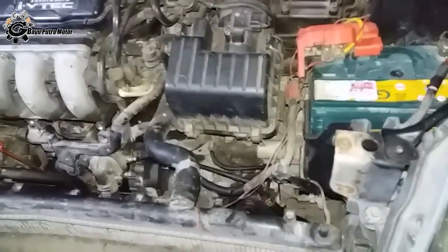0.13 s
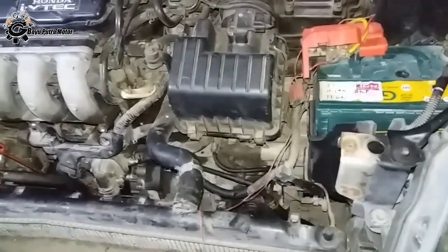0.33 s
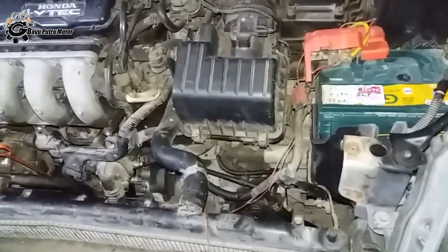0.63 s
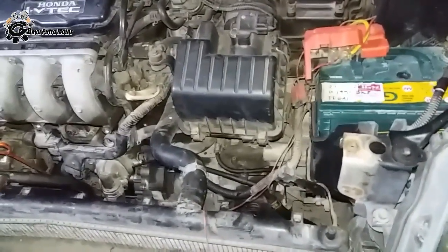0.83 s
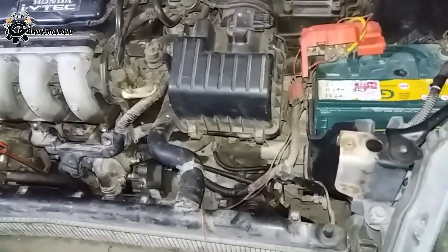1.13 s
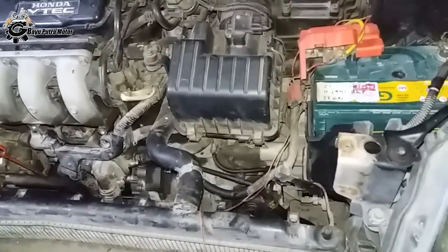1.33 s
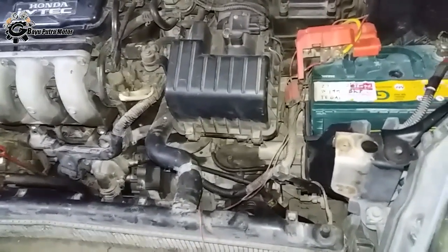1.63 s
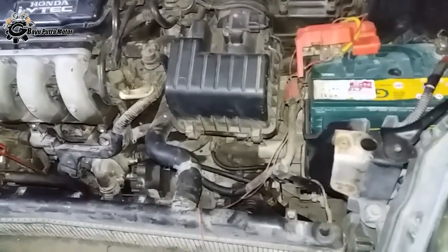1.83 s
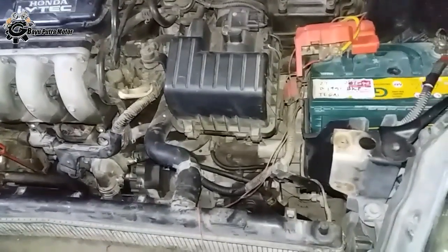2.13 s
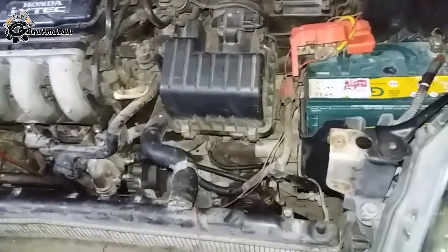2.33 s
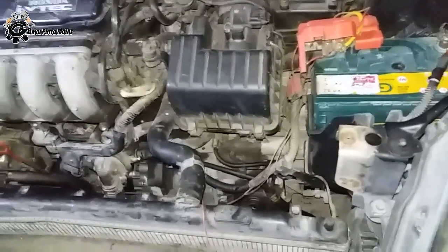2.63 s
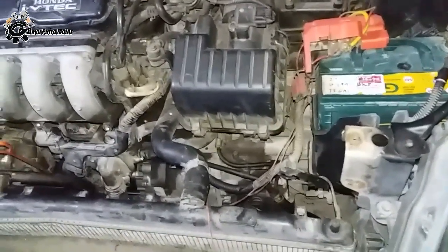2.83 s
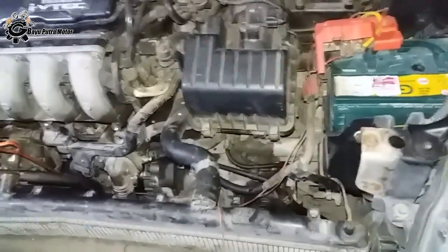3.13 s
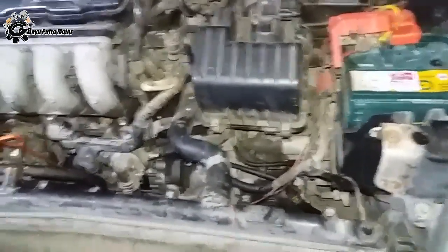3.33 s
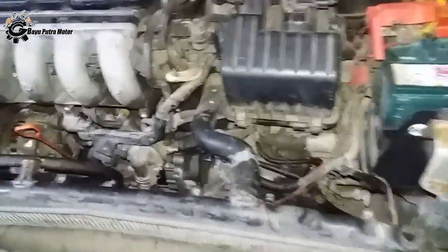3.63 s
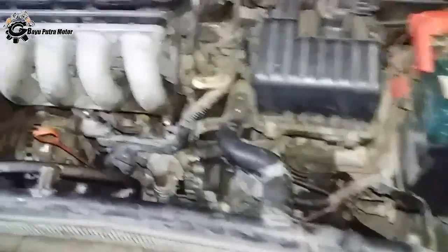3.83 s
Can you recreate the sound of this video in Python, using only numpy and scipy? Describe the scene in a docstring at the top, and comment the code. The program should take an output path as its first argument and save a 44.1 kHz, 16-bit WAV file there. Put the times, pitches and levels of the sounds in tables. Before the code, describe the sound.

A car's petrol engine cranks, catches and revs up to a fast idle.

```python
"""A quiet yard, above an open engine bay: a four-cylinder petrol engine is started.
Over a distant rumble and faint insects, the starter clacks in and its gears grind through a few
compressions. The first firings clatter unevenly, the freed starter whirrs and coasts down, and the
engine climbs smoothly to a fast idle. Hails of tiny metal contacts make the rattle, clatter and hiss;
tones that follow the turning parts make the hum and whine."""
import sys
import numpy as np
from scipy import signal
from scipy.fft import rfft, irfft
from scipy.io import wavfile

SR = 44100
rng = np.random.default_rng(int(sys.argv[2]) if len(sys.argv) > 2 else 0)


def wav_out(sig):
    """Save sig, one row per channel (or a flat mono array), as 16-bit PCM at SR to the path in sys.argv[1]."""
    wavfile.write(sys.argv[1], SR, np.round(np.clip(np.atleast_2d(sig).T, -1, 1) * 32767).astype(np.int16))


N = 176400
T = np.arange(N) / SR

# Spectra of gear rattle, metal rasp and valve and belt hiss. Each row: frequency in Hz, level in dB.
GEAR_SPECTRUM = [(70, -34), (120, -28), (310, -10.5), (594, -2), (751, -8.5), (883, -2.5), (2080, -3),
                 (2350, -13), (2900, -25), (4200, -35), (8800, -104)]
RASP_SPECTRUM = [(1500, -11.5), (2700, 3.5), (3800, -5), (4900, 7.5), (6100, -3.5), (6700, -2.5),
                 (7600, -12.5), (12500, -23.5), (14500, -22.5)]
HISS_SPECTRUM = [(2500, -19), (3650, -9), (4300, 1), (5050, 3), (5900, -1.5), (6600, 1), (7400, -9.5),
                 (9000, -13.5), (10300, -18.5), (11400, -18.5), (12500, -20), (15000, -21)]


def amp(db):
    return 10 ** (np.asarray(db) / 20)


def unit(x):
    return x / np.sqrt(np.mean(x ** 2) + 1e-20)


def curve(rows, column=1):
    """One column of a table, joined by straight lines in time."""
    rows = np.array(rows, float)
    return np.interp(T, rows[:, 0], rows[:, column])


def fader(rows, column=1):
    """A dB column as gain, silent before its first row and after an early last one."""
    holds_to_end = rows[-1][0] > .9 * T[-1]
    return amp(curve(rows, column)) * (T >= rows[0][0]) * ((T <= rows[-1][0]) | holds_to_end)


def swell(peak_s, half_s):
    """A bell-shaped rise and fall."""
    return np.exp(-((T - peak_s) / half_s) ** 2)


def drift(hz):
    """A random waver up to about hz, rms 1."""
    f = np.fft.rfftfreq(N, 1 / SR)
    return unit(irfft(rfft(rng.standard_normal(N)) * np.exp(-(f / hz) ** 2), N))


def colour(x, spectrum, ring=0):
    """Minimum-phase EQ to a spectrum, plus a share of the engine block's ring; rms 1."""
    # Resonances of block and covers. Each row: centre in Hz, width in Hz, lift in dB.
    block_modes = [(877, 120, 7.5), (1161, 52, 10), (1500, 160, 8), (1968, 190, 10.5)]
    f = np.fft.rfftfreq(N, 1 / SR)
    hz, db = np.transpose(spectrum)
    ring_db = sum(lift / (1 + (2 * (f - centre) / width) ** 2) for centre, width, lift in block_modes)
    eq_db = np.interp(np.log(f + 1), np.log(hz + 1), db) + ring * ring_db
    cepstrum = irfft(np.log(amp(np.maximum(eq_db, -100))), N)
    cepstrum[1:N // 2] *= 2
    cepstrum[N // 2 + 1:] = 0
    return unit(irfft(rfft(x) * np.exp(rfft(cepstrum)), N))


def impacts(per_s, spread_db):
    """A dense hail of small metal contacts of uneven size."""
    size = amp(spread_db * np.minimum(rng.exponential(1, N), 3))
    return unit(size * rng.choice([-1., 1.], N) * (rng.random(N) < per_s / SR))


def tone(cycles):
    """A sine of rms 1 with a random starting phase."""
    return np.sqrt(2) * np.sin(2 * np.pi * (cycles + rng.random()))


def strokes(cycles, base, decay, uneven_db):
    """A jolt at the start of each cycle on a steady base; decay is in cycles."""
    strength = amp(uneven_db * np.clip(rng.standard_normal(N), -2, 2))[cycles.astype(int)]
    return base + strength * np.exp(-(cycles % 1) / decay)


def pip(at_s, hz=5070, fall_hz_per_s=20000):
    """One tiny pip, falling in pitch."""
    t = T - at_s
    return swell(at_s, half_s=.0058) * tone(t * (hz - fall_hz_per_s * t / 2))


def yard():
    """Distant rumble, faint chirps and insects, a brief electrical whistle and a passing far-off hum."""
    # Outdoor air. Each row: frequency in Hz, level in dB.
    air_spectrum = [(15, -40), (25, -26), (75, 3), (198, -0.5), (340, -8), (469, -8), (552, -12),
                    (970, -19.5), (3170, -36), (3720, -45), (4380, -40.5), (15500, -47)]
    # High chirps of three pips that grow louder. Each entry: time of the last pip in seconds.
    chirp_times = [.029, .181, .399, .601, .789, .975, 1.195, 1.379, 1.566, 1.787, 1.971]
    # Distant insects. Each row: time in seconds, level in dB.
    insect_levels = [(.3, -96), (.65, -84.5), (1.4, -88.5), (1.72, -78), (2.05, -89)]
    # Thin electrical tones. Each row: pitch in Hz, level in dB.
    whistle_tones = [(1001, -79), (6002, -89.5)]
    air = amp(-57) * colour(rng.standard_normal(N), air_spectrum)
    chirps = sum(amp(-80.5 - 4 * k + 2 * rng.standard_normal()) * pip(s - .033 * k)
                 for s in chirp_times for k in range(3))
    insects = fader(insect_levels) * drift(hz=260) * tone(3680 * T)
    whistle = sum(amp(db) * tone(hz * T) for hz, db in whistle_tones)
    whistle += amp(-89) * drift(hz=90) * tone(5070 * T)
    hum = amp(-69) * swell(1.55, half_s=.35) * tone(470 * T) * drift(hz=22)
    return air + chirps + insects + whistle * (T < .474) + hum


def engine_bay(x, wet_db, t60_s):
    """Adds short reflections from bonnet, wings and nearby walls."""
    t = T[:SR // 2]
    tail = rng.standard_normal(len(t)) * amp(-60 * t / t60_s) * (t > .003)
    return x + amp(wet_db) * signal.fftconvolve(x, tail / np.linalg.norm(tail))[:N]


def starter_coasting():
    """The freed starter races and runs down, whirring in rotor overtones; two flare into a whine."""
    # Free rotor. Each row: time in seconds, turns per second, whirr level in dB.
    rotor = [(2.54, 314, -70), (2.6, 321, -61), (2.8, 338, -61), (2.92, 322, -58), (3.1, 276, -53.5),
             (3.45, 200, -53), (3.8, 130, -62)]
    # Whine partials. Each row: multiple of the rotor speed, relative level in dB.
    whine_partials = [(12, 3), (18, -6)]
    # Flares of the whine. Each row: peak time in seconds, half length in seconds, level in dB.
    flares = [(2.6, .035, -52), (2.925, .045, -53.5)]
    turns = np.cumsum(curve(rotor) * (1 + .004 * drift(136))) / SR
    comb = sum(amp(3 * drift(9)) * tone(k * turns) for k in range(15, 43, 3))
    lowpass = signal.butter(10, 6700, fs=SR, output="sos")
    whirr = signal.sosfilt(lowpass, colour(comb, HISS_SPECTRUM)) * fader(rotor, column=2)
    whine = sum(amp(db) * tone(k * turns) for k, db in whine_partials)
    whine *= sum(amp(db) * swell(s, half) for s, half, db in flares)
    return whirr + whine


def starter_clack(rise_s=.002):
    """Solenoid and pinion slam in, shaking the starter housing twice."""
    # Slams. Each row: start in seconds, body level in dB, treble level in dB, decay in seconds.
    slams = [(2.054, -26, -36, 0.006), (2.063, -27, -41.5, 0.02)]
    noise = rng.standard_normal(N)
    body, treble = colour(noise, GEAR_SPECTRUM, ring=.13), colour(noise, RASP_SPECTRUM)
    clacks = np.zeros(N)
    for s, body_db, treble_db, decay in slams:
        envelope = np.clip((T - s) / rise_s, 0, 1) * np.exp(-abs(T - s) / decay)
        clacks += envelope * (amp(body_db) * body + amp(treble_db) * treble)
    return clacks


def starter_cranking():
    """Pinion teeth sing, strike and rattle against the ring gear."""
    # Gear mesh, sagging at each compression. Each row: time in seconds, pitch in Hz, level in dB.
    mesh = [(2.05, 330, -74), (2.075, 563.6, -45), (2.1, 573.7, -53), (2.145, 599.4, -36),
            (2.175, 520, -50), (2.23, 604, -42), (2.252, 571, -43), (2.275, 556.2, -31), (2.298, 520, -34),
            (2.315, 440, -48), (2.335, 605, -38), (2.37, 607.3, -45), (2.412, 591.6, -35), (2.44, 500, -45),
            (2.48, 458.6, -53), (2.52, 440, -85)]
    # Partials of mesh and chatter. Each row: multiple of the mesh pitch, relative level in dB.
    mesh_partials = [(1, 0), (2, -.5), (3, -11), (4, -18), (5, -13), (6, -16)]
    chatter_partials = [(.5, -2), (1.5, -2.5), (2.5, -14)]
    # The pinion chatters on every second tooth as the load comes off.
    # Each row: peak time in seconds, half length in seconds, level in dB.
    chatter_swells = [(2.145, 0.027, -39.5), (2.339, 0.0081, -29)]
    # Grinding. Each row: time in seconds, gear rattle in dB, treble rasp in dB.
    grind = [(2.045, -56, -70), (2.053, -36, -38.5), (2.075, -32.5, -56), (2.1, -39, -49.5),
             (2.15, -31.5, -50), (2.212, -29, -53.5), (2.235, -31, -45.5), (2.283, -35.5, -39),
             (2.335, -25.5, -43.5), (2.368, -34, -41), (2.405, -39.5, -38), (2.445, -28.5, -46.5),
             (2.47, -41.5, -42.5), (2.6, -42, -58), (2.7, -40, -41.5), (2.825, -40, -40), (2.86, -67, -80)]
    teeth = np.cumsum(curve(mesh) * (1 + .015 * drift(150))) / SR
    sing = sum(amp(db + 2.5 * drift(45)) * tone(k * teeth) * (1 + .3 * drift(140))
               for k, db in mesh_partials) * fader(mesh, column=2)
    chatter = sum(amp(db) * tone(k * teeth) * (1 + .057 * drift(72)) for k, db in chatter_partials)
    chatter *= sum(amp(db) * swell(s, half) for s, half, db in chatter_swells)
    bite = strokes(teeth / 2, base=.4, decay=.4, uneven_db=2)
    every_second_tooth = np.diff(np.floor(teeth / 2), prepend=0)
    strikes = unit(every_second_tooth * (1 + .8 * rng.standard_normal(N)))
    grit = unit(bite * impacts(7000, spread_db=2))
    rattle = colour(.5 * strikes + grit, GEAR_SPECTRUM, ring=1) * fader(grind)
    rasp = colour(bite * impacts(12000, spread_db=-2.5), RASP_SPECTRUM) * fader(grind, column=2)
    return sing + chatter + rattle + rasp


def first_firings(fall_s=.0097):
    """Each hard compression or early firing jerks the crank and sets the gears clattering."""
    # Jolts. Each row: peak time in seconds, rise in seconds, level in dB.
    jolts = [(2.166, 0.011, -38), (2.264, 0.023, -28.5), (2.34, 0.0088, -41.5), (2.395, 0.0024, -27.5),
             (2.45, 0.012, -31.5), (2.486, 0.009, -27), (2.521, 0.013, -29.5), (2.601, 0.023, -30),
             (2.682, 0.011, -22.5), (2.699, 0.0039, -30), (2.734, 0.006, -24.5), (2.771, 0.011, -33.5),
             (2.799, 0.0096, -32.5), (2.828, 0.006, -32)]
    # Their clatter. Each row: frequency in Hz, level in dB.
    jolt_spectrum = [(88, -54), (432, -23), (576, 1), (759, -14.5), (1530, 7.5), (3170, -26), (4000, -17),
                     (5200, -65), (8800, -120)]
    power = sum((amp(db) * np.exp(-abs(T - s) / np.where(T < s, rise, fall_s))) ** 2
                for s, rise, db in jolts)
    hits = impacts(7000, spread_db=1.5)
    clatter = colour(hits, jolt_spectrum, ring=.93) + amp(-10) * colour(hits, RASP_SPECTRUM)
    return np.sqrt(power) * clatter


def engine_running():
    """Clatter, hiss and rumble pulse with the firings, over the hum of the crank."""
    # Engine speed. Each row: time in seconds, firings per second.
    revs = [(2.45, 14), (2.7, 29), (2.88, 40), (3.09, 46.3), (3.29, 52.5), (3.49, 58.4), (3.92, 65.1),
            (4.0, 64.8)]
    # Engine mix. Each row: time in seconds, then clatter, valve and belt hiss, and rumble in dB.
    mix = [(2.06, -79, -62, -40), (2.44, -77, -58, -63), (2.52, -42.5, -44.5, -82), (2.83, -39, -44, -47.5),
           (2.9, -41.5, -46.5, -65.5), (3.15, -40, -46, -46.5), (3.3, -36, -44, -49),
           (3.5, -34, -43.5, -45.5), (3.75, -32, -45, -49.5), (4.0, -32, -46, -42.5)]
    # Spectra of clatter and rumble. Each row: frequency in Hz, level in dB.
    clatter_spectrum = [(180, -42.5), (300, -7), (560, -10.5), (680, -1.5), (780, -9), (1160, 0), (1950, 0),
                        (2750, -4.5), (3100, -15), (4200, -15), (8800, -94)]
    rumble_spectrum = [(30, -17), (70, 0.5), (120, 2), (1000, 2), (2000, -57)]
    # Hum. Each row: time in seconds, then levels in dB at 1, 2 and 4 times the firing rate.
    hum_levels = [(2.8, -93, -55.5, -64), (3.3, -61, -51.5, -50), (3.5, -50, -54, -54),
                  (3.75, -47, -54, -50.5), (4.0, -43.5, -57, -45)]
    # Shafts and accessories. Each row: multiple of the firing rate, level in dB against the clatter.
    shaft_partials = [(8, -20), (11.8, -19), (88.8, -25)]
    firings = np.cumsum(curve(revs) * (1 + .00467 * drift(22.3))) / SR

    # One cylinder knocks once in every four firings, fading in near the top of the climb.
    onset_s, full_s, decay_s = 3.45, 3.795, .007
    since_knock_s = (firings - np.interp(full_s, T, firings)) % 4 / curve(revs)
    knock = amp(1.5) * np.exp(-since_knock_s / decay_s) * np.interp(T, [onset_s, full_s], [0, 1])

    pulse = strokes(firings, base=9.9, decay=1, uneven_db=0) * (1 + knock)
    valves = strokes(2 * firings, base=2.5, decay=.25, uneven_db=3)
    clatter = colour(pulse * impacts(9000, spread_db=1.46), clatter_spectrum, ring=.31) * fader(mix)
    hiss = colour(valves * impacts(15000, spread_db=-1.5), HISS_SPECTRUM) * fader(mix, column=2)
    rumble = colour(pulse * rng.standard_normal(N), rumble_spectrum) * fader(mix, column=3)
    hum = sum(tone(k * firings) * fader(hum_levels, column) for column, k in enumerate((1, 2, 4), 1))
    whines = sum(amp(db) * tone(k * firings) * (1 + .5 * drift(18)) for k, db in shaft_partials)
    # The intake rings briefly, timed to the revs passing its resonance.
    boom = amp(-40) * swell(3.278, half_s=.052) * tone(301.5 * T) * (1 + .25 * drift(70))
    return clatter + hiss + rumble + hum + whines * fader(mix) + boom


def scene():
    """Starter and engine in their bay, with the yard behind; mono."""
    car = starter_cranking() + starter_clack() + first_firings() + engine_running() + starter_coasting()
    return (engine_bay(car, wet_db=-12, t60_s=.036) + yard())[None]


def record(dry):
    """A quick limiter holds down the loudest moments, then a low-pass trims the very top."""
    threshold_db, half_window_s, cutoff_hz = -20.5, .002, 15600
    window = signal.windows.hann(2 * int(half_window_s * SR) + 1) / (half_window_s * SR)
    power = signal.oaconvolve(dry ** 2, window[None], "same")
    limited = dry / (1 + (power / amp(threshold_db) ** 2) ** 2) ** .25
    lowpass = signal.firwin(511, cutoff_hz, window=("kaiser", 9), fs=SR)
    return signal.oaconvolve(limited, lowpass[None], "same")


dry = scene()
out = record(dry)
wav_out(out)
```